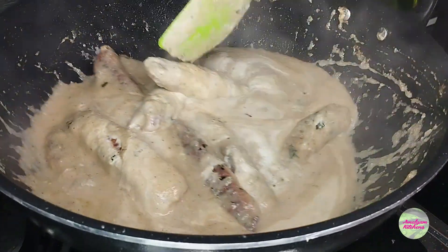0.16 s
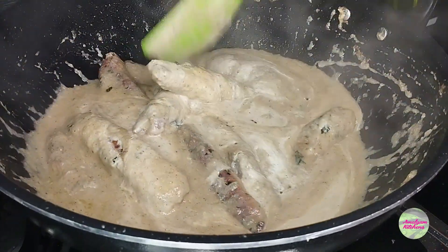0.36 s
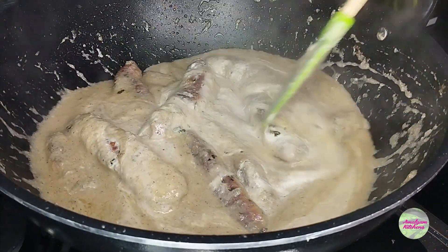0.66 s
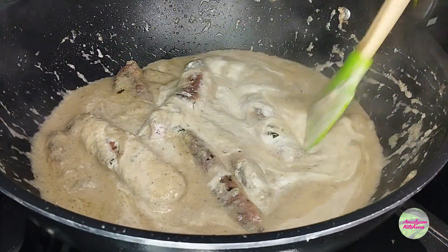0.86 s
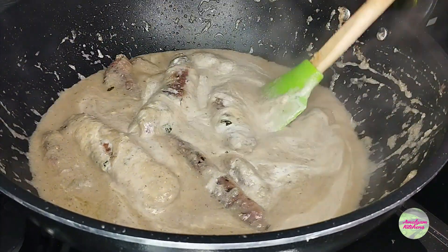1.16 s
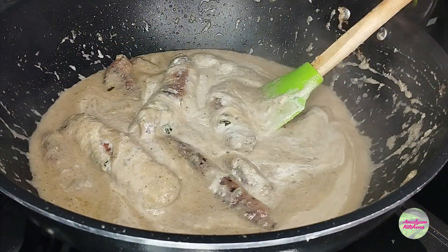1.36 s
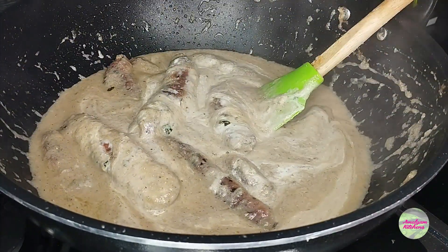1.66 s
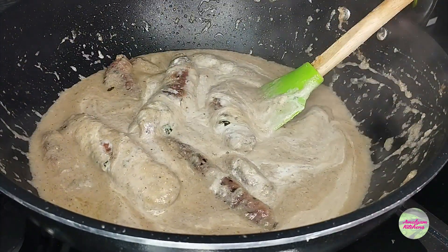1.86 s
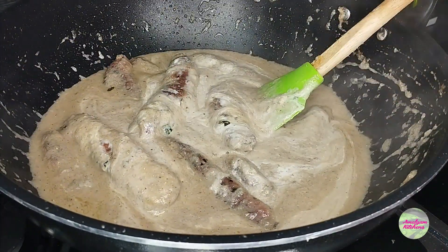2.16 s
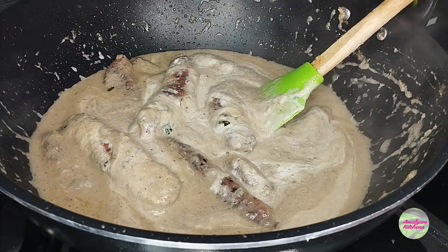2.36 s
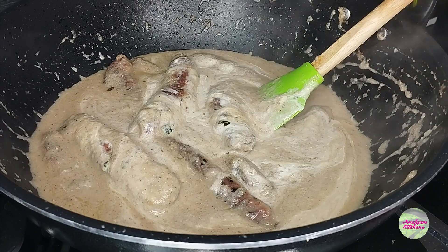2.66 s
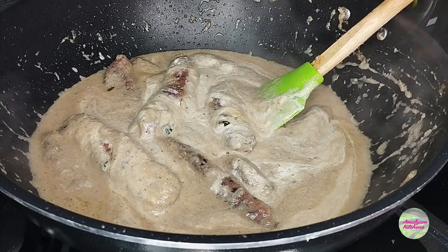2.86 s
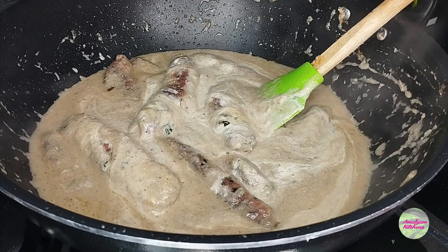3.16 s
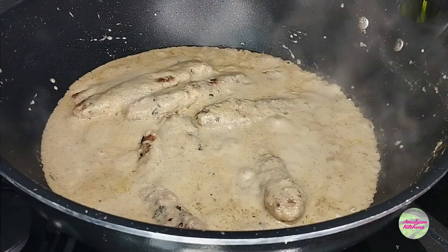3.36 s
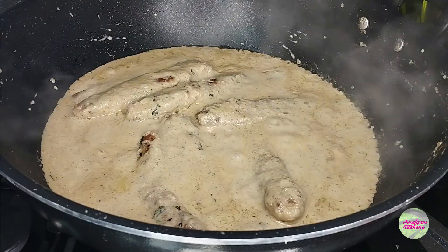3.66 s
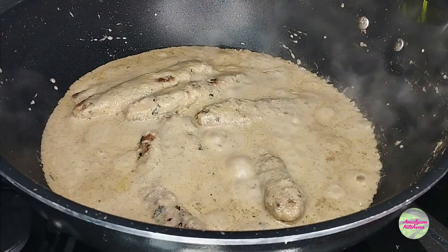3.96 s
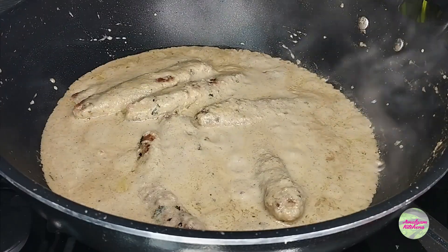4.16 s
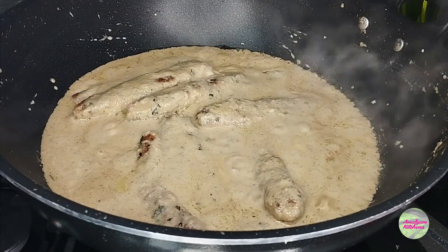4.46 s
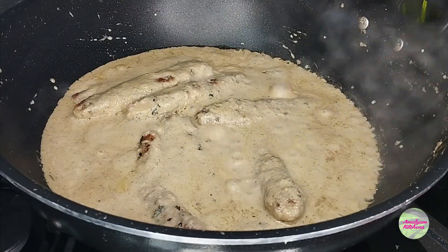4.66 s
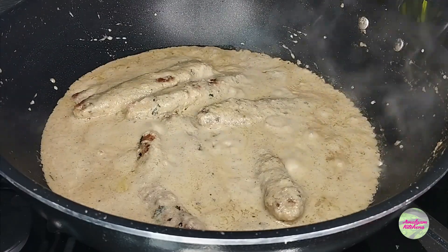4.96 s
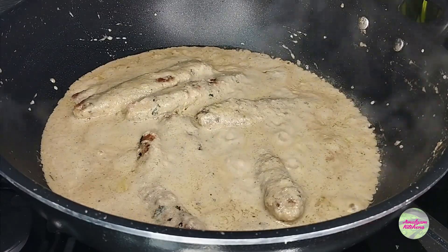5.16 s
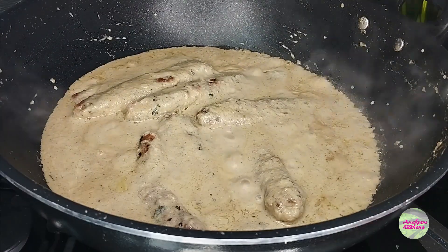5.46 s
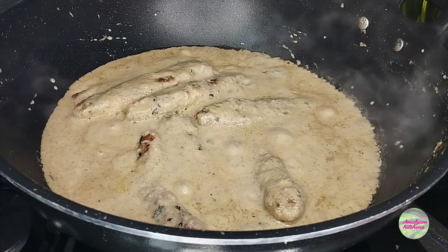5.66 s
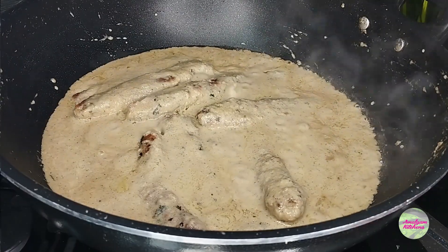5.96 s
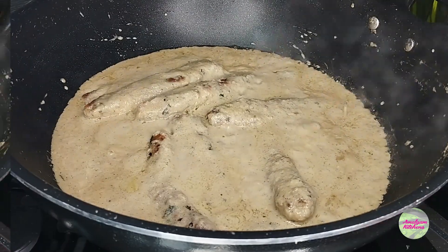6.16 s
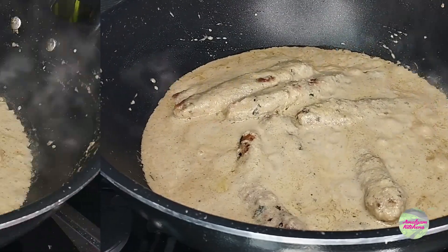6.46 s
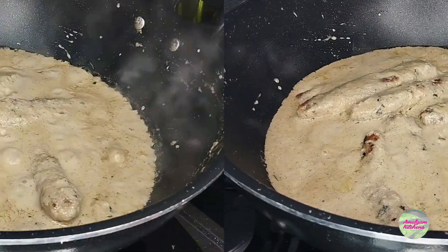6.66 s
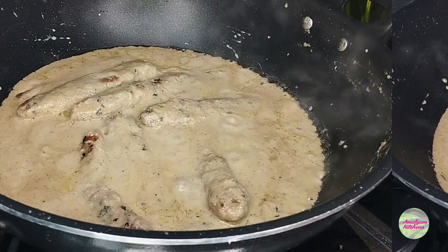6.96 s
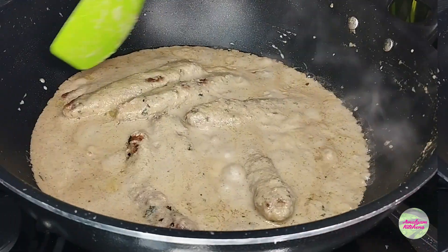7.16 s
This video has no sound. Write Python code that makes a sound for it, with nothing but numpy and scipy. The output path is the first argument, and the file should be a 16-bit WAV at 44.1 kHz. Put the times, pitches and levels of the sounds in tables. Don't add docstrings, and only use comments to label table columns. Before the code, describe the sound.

Quiet wide stereo room tone with low spatula knocks at the start, small crisp spits, dull fan thuds, a soft rim tap with a distant squeak, and one bright metal clink. Abruptly the microphone is right over thick boiling gravy, centred and loud, with gulping bubbles, sputtering steam and bassy air rumble under a very high whine. After a momentary gap, the boil returns turned down.

```python
import sys
import numpy as np
from scipy import signal
from scipy.fft import rfft, irfft
from scipy.io import wavfile

SR = 44100
rng = np.random.default_rng(int(sys.argv[2]) if len(sys.argv) > 2 else 0)


def to_wav(sig):
    pcm = np.clip(np.atleast_2d(sig), -1, 1) * 32767
    pcm = np.round(pcm).astype(np.int16)
    wavfile.write(sys.argv[1], SR, pcm.T)


def linear_from_db(decibels):
    return 10 ** (np.asarray(decibels, float) / 20)


N = 322306
CUT_IN_S, CUT_OUT_S, RESUME_S = 3.2915, 6.6935, 6.7635

# [f/Hz, width/Hz, level/dB]
WOK_RINGS = [(190, 8.2, -0.5), (244.7, 8.3, -2), (350, 37, -4), (503, 8.1, 1), (600, 51, 1.5),
             (722, 72, -1), (942, 6.3, -12), (1450, 110, -2), (2000, 96, -6), (2550, 43, -10.5)]


def rms_one(x):
    return x / np.sqrt(np.mean(x ** 2) + 1e-20)


def at_hz(points, hz):
    f_hz, value = np.array(points).T[:2]
    return np.interp(np.log(hz), np.log(f_hz), value)


def in_time(rows):
    s, *columns = np.transpose(rows)
    return [np.interp(np.arange(N) / SR, s, c) for c in columns]


def drift(rate):
    r = np.exp(-80 * np.pi * rate / SR)
    slow = signal.lfilter([1], [1, -2 * r, r * r], rng.standard_normal(N // 40 + 2002))[2000:]
    return np.interp(np.arange(N) / 40, np.arange(len(slow)), rms_one(slow))


def tone(hz):
    return np.sin(2 * np.pi * np.cumsum(hz) / SR)


def coloured(spectrum):
    hz = np.maximum(np.arange(N // 2 + 1) * SR / N, 1)
    return irfft(rfft(rng.standard_normal(N)) * linear_from_db(at_hz(spectrum, hz)), N)


def ring(clicks, hz, t60):
    r, w = linear_from_db(-60 / (t60 * SR)), 2 * np.pi * hz / SR
    return signal.lfilter([0, np.sin(w)], [1, -2 * r * np.cos(w), r * r], clicks + 1e-18)


def struck(hits, modes, offset_db, spread_db, split_hz=200):
    hits, out = np.array(hits), np.zeros(N)
    luck = rng.standard_normal((len(hits), len(modes)))
    at = (hits[:, 0] * SR).astype(int)
    for k, (hz, level_db, t60) in enumerate(modes):
        clicks = np.zeros(N)
        upper_db = hits[:, 2] * (hz > split_hz) if hits.shape[1] > 2 else 0
        clicks[at] = linear_from_db(hits[:, 1] + upper_db + level_db + offset_db + spread_db * luck[:, k])
        out[:4 * SR] += ring(clicks[:4 * SR], hz, t60)
    return out


def hisses(events, offset_db):
    out, jet = np.zeros(N + SR), rng.standard_normal(N + SR)
    for s, peak_db, hz, length, octaves in events:
        decay_s = max(length, .002)
        at, t = int(s * SR), np.arange(int(4.5 * decay_s * SR)) / SR
        edges = np.clip(hz * 2 ** (np.array([-.5, .5]) * max(octaves, .03)), 50, .45 * SR)
        band = signal.butter(2, edges, "band", fs=SR, output="sos")
        shape = np.minimum(t / 0.00037, 1) * np.exp(-t / decay_s)
        noise = rms_one(signal.sosfilt(band, jet[at:at + len(t)]))
        out[at:at + len(t)] += linear_from_db(peak_db + offset_db) * shape * noise
    return out[:N]


def air():
    # [f/Hz, level/dB per Hz]
    air_spectrum = [(7.1, -32), (12, 10), (30, -0.5), (86, -2.5), (134, -17), (186, -17.5), (283, -14),
                    (442, -23), (827, -28), (1020, -35), (2080, -39.5), (6090, -45.5), (10700, -58),
                    (12100, -51), (14900, -48)]
    # [f/Hz, share]
    likeness = [(60, 0.81), (180, 1), (550, 0.41), (1650, 0.01), (4970, 0.045), (15000, 0.057)]
    hz = np.maximum(np.arange(N // 2 + 1) * SR / N, 1)
    alike = np.clip(at_hz(likeness, hz), 0, 1)
    mid = rfft(coloured(air_spectrum)) * np.sqrt(1 + alike)
    side = rfft(coloured(air_spectrum)) * np.sqrt(1 - alike)
    level_db = -37.5 + 1.2 * drift(3)
    return linear_from_db(level_db) * rms_one(irfft(np.array([mid + side, mid - side]), N))


def coil():
    carriers_hz, ripple_hz = (15595.9, 11696.9), 100.5
    multiples = [
        [-6, -5, -4, -3, -2, -1, 0, 1],
        [-2, -1, 0, 1, 3],
    ]
    lines_db = [
        [-29, -30, -34, -24, -19, -16, 0, -13],
        [-31, -29, -12.5, -25, -33],
    ]
    t, out = np.arange(N) / SR, np.zeros(N)
    wander = np.cumsum(1.3 * drift(0.426)) / SR
    for hz, offsets, levels_db in zip(carriers_hz, multiples, lines_db):
        for k, line_db in zip(offsets, levels_db):
            out += np.sqrt(2) * linear_from_db(line_db) * np.sin(2 * np.pi * ((hz + k * ripple_hz) * t + wander))
    return out


def chirp():
    level_db = -84.5 + 2.0 * drift(20)
    return linear_from_db(level_db) * tone(6100 * (1 + 0.0055 * drift(97)))


def chatter(x, length):
    t = np.arange(int(4 * length * SR)) / SR
    rattle = rng.standard_normal(len(t)) * np.exp(-t / length)
    return signal.fftconvolve(x, rattle / np.sqrt(np.sum(rattle ** 2)))[:N]


def knocks():
    # [t/s, peak/dB]
    contacts = [
        (0.0597, -20.5),
        (0.0655, -21.5),
        (0.139, -28.5),
        (0.201, -28),
    ]
    # [f/Hz, level/dB, t60/s]
    wok_full = [(165, -8, 0.12), (206.7, 1.5, 0.18), (270.4, 9, 0.096), (299, -2.5, 0.094),
                (630, 4.5, 0.07), (693.3, 15, 0.088)]
    # [level/dB, centre f/Hz, length/s, width/octaves]
    thud_bands = [(-5, 285, 0.049, 1), (-4, 700, 0.022, 1.0), (-6, 1150, 0.014, 1), (-14, 2200, 0.016, 1.0),
                  (-20, 4200, 0.012, 0.6)]
    body = [(s, peak_db + band_db, hz, length, octaves)
            for s, peak_db in contacts for band_db, hz, length, octaves in thud_bands]
    stir_tail = (0, -49, 2500, .05, 1.5)
    soft = signal.lfilter([.2], [1, -.8], struck(contacts, wok_full, offset_db=-5.5, spread_db=6.0))
    return chatter(soft, length=0.0034) + hisses(body + [stir_tail], offset_db=-8.0)


def spits():
    # [t/s, peak/dB, centre f/Hz]
    narrow = [(0.099, -47, 9700), (0.15, -38, 3920), (0.1674, -49, 3410), (0.3651, -47, 13100),
              (0.464, -47, 6500), (0.569, -35, 4300), (0.609, -42, 13300), (0.6659, -38.5, 5170),
              (0.849, -37.5, 14000), (1.141, -48, 9550)]
    # [t/s, peak/dB]
    broad = [
        (0.588, -42),
        (0.839, -44),
        (0.848, -40.5),
    ]
    length_s = 0.0048
    events = [(*row, length_s, 0.45) for row in narrow]
    events += [(*row, 3250, length_s, 1.7) for row in broad]
    return hisses(events, offset_db=-8.5)


def fan_thuds():
    # [t/s, peak/dB, upper mode share/dB]
    thuds = [(0.396, -33.5, 3.5), (0.478, -36.5, 6.5), (0.659, -35, 1), (0.779, -32.5, 3),
             (0.872, -32, -0.5), (1.041, -38.5, 5), (1.144, -35, 7), (1.433, -34.5, 9.5), (1.613, -35, 1),
             (1.713, -35.5, 4.5), (1.816, -30.5, -4), (2.012, -35.5, 4.5), (2.114, -35, 7.5),
             (2.303, -37, 8), (2.408, -45, 18.5), (2.583, -40.5, 10.5), (2.689, -43.5, 18),
             (2.865, -38, 2.5), (2.983, -35, 7), (3.085, -34.5, 6.5)]
    # [f/Hz, level/dB, t60/s]
    housing = [(103.7, -8.5, 0.16), (183, 4.5, 0.11), (240, -0.5, 0.15), (490, -10, 0.025),
               (814, -23, 0.21)]
    blows = struck(thuds, housing, offset_db=2.0, spread_db=0.5)
    rebound = np.roll(blows, round(0.01044 * SR))
    out = signal.lfilter([.012], [1, -1.78, .792], -.8 * blows - 0.43 * rebound)
    return out + hisses([(s, peak_db, 720, .016, 1.1) for s, peak_db, _ in thuds], offset_db=-17.5)


def squeaks():
    # [t/s, f/Hz, level/dB]
    tracks = [
        [(1.29, 5550, -80), (1.47, 6250, -80), (1.55, 5750, -73), (1.73, 4850, -77), (1.75, 4800, -90)],
        [(1.27, 4550, -78), (1.32, 4750, -75), (1.45, 5200, -73), (1.6, 4850, -78), (1.75, 3750, -88),
         (1.88, 3620, -82), (1.93, 3500, -93)],
    ]
    # [t/s, peak/dB, centre f/Hz, length/s, width/octaves]
    rub = [
        (1.27, -69.5, 4800, 0.18, 0.46),
        (1.36, -69.5, 3000, 0.39, 1.4),
        (1.42, -77, 5400, .15, 0.35),
    ]
    out = hisses(rub, offset_db=-4.5)
    for rows, waver in zip(tracks, (.003, .05)):
        (start_s, start_hz, _), (end_s, end_hz, _) = rows[0], rows[-1]
        points = [(start_s - .02, start_hz, -120), *rows, (end_s + .02, end_hz, -120)]
        hz, level_db = in_time(points)
        flicker_db = 5 * drift(30)
        out += linear_from_db(level_db + flicker_db) * tone(hz * (1 + waver * drift(125.0)))
    return out


def tap():
    # [t/s, peak/dB, upper mode share/dB]
    contacts = [
        (1.3145, -38, 7),
        (1.323, -27, -9),
        (1.331, -29, -20),
    ]
    # [f/Hz, level/dB, t60/s]
    rim = [(215, -2, .09), (366, -5, .24), (405, -8, .14), (570, 1, .03), (940, -3, .03), (1120, -7, .025),
           (1300, -4, .018), (1490, -5, .022), (2900, 6, .012)]
    coating = signal.butter(4, 1650, fs=SR, output="sos")
    return signal.sosfilt(coating, struck(contacts, rim, offset_db=-2.5, spread_db=0, split_hz=480))


def clink():
    # [t/s, peak/dB]
    blow = [
        (2.3042, -14.5),
    ]
    # [f/Hz, level/dB, t60/s]
    steel = [(1270, -15, .04), (1980, -12, .05), (2140, -4, .06), (2230, -5, .05), (2860, -6, .045),
             (2950, -2, .05), (3440, -7, .04), (3750, -15, .03), (4030, -4, .05), (4200, -10, .04),
             (5000, -15, .03), (5500, -11, .04), (6300, -15, .025), (7150, -13, .025)]
    s, peak_db = blow[0]
    body = [(s, peak_db - 3, 9000, .005, 1.5),
            (s, peak_db + 2, 3000, .022, 1.1),
            (s, peak_db - 5, 6000, .014, .7)]
    return struck(blow, steel, offset_db=-6.5, spread_db=0) + hisses(body, offset_db=-16)


def kitchen(x):
    t60_s, side_db = 0.64, 2
    t = np.arange(int(.7 * SR)) / SR
    noise = rng.standard_normal((2, len(t)))
    dull = signal.sosfilt(signal.butter(1, 5000, fs=SR, output="sos"), noise)
    treble = (noise - dull) * linear_from_db(-90 * t)
    mid, side = (dull + treble) * linear_from_db(-60 * t / t60_s) * (t > .003)
    side = linear_from_db(side_db) * signal.sosfilt(signal.butter(2, 350, "high", fs=SR, output="sos"), side)
    tail = np.array([mid + side, mid - side]) / np.sqrt(2 * np.sum(mid ** 2))
    return signal.fftconvolve(x[None, :4 * SR], tail, axes=1)[:, :4 * SR]


def quiet_shot():
    spatula, thuds, handle, steel = knocks(), fan_thuds(), tap(), clink()
    squeak = chirp() + squeaks()
    out = air() + linear_from_db(-72) * coil() + spatula + spits() + thuds
    out += linear_from_db(9.5) * squeak + linear_from_db(2.0) * handle
    out += steel * linear_from_db(np.array([[-5], [-6]]))
    wet = linear_from_db(-3.5) * spatula + linear_from_db(-7.0) * thuds + linear_from_db(12.0) * squeak
    wet += linear_from_db(-3.5) * handle + linear_from_db(-11.5) * steel
    out[:, :4 * SR] += kitchen(wet)
    return out


def fan_draught(heave_db):
    # [f/Hz, level/dB per Hz]
    rumble = [(4, -60), (8, 3), (16, -1.5), (25, -3), (33, -10.5), (42, -6.5), (62, -23), (81, -13),
              (100, -16.5), (125, -29), (160, -66), (250, -56.5)]
    throb_db = -6.5 + 4.1 * drift(3.9)
    throb = linear_from_db(throb_db) * tone(25.1 * (1 + 0.0638 * drift(3.06)))
    return linear_from_db(heave_db - 0.5) * (rms_one(coloured(rumble)) + throb)


def plops(heave_db):
    out, surge = np.zeros(N), drift(7)
    for hz, width_hz, ring_db in WOK_RINGS:
        happens = rng.random(N) < 90 * linear_from_db(4 * surge) / SR
        strength = linear_from_db(2.7 * np.minimum(rng.exponential(1, N), 4))
        kicks = happens * strength * rng.choice([-1, 1], N)
        out += linear_from_db(ring_db) * rms_one(ring(kicks, hz, 1.87 / width_hz))
    return linear_from_db(-34.5 + heave_db + 20.0) * rms_one(out)


def steam_bed(steam_db):
    # [f/Hz, level/dB per Hz]
    steam = [(100, -51), (140, 0), (255, 2.5), (500, -2.5), (1030, -6.5), (1440, -9), (3400, -13),
             (5800, -13.5), (9000, -20.5), (12500, -23), (14500, -43), (16000, -39)]
    return linear_from_db(steam_db + 2.5 + 1.98 * drift(32.6)) * rms_one(coloured(steam))


def simmer(steam_db):
    luck = rng.random((340, 5))
    s = CUT_IN_S + luck[:, 0] * (N / SR - CUT_IN_S)
    octaves_up = 3.68 * luck[:, 2] ** 1.685
    level_db = steam_db[(s * SR).astype(int)] + 14 * luck[:, 1] - 2.5 * octaves_up
    hz, length_s = 800 * 2 ** octaves_up, 0.0056 + 0.013 * luck[:, 3]
    octaves = .12 + .6 * luck[:, 4]
    return hisses(np.transpose([s, level_db, hz, length_s, octaves]), offset_db=-7.5)


def bursts():
    # [t/s, peak/dB, centre f/Hz, length/s]
    dull_rows = [(3.347, -14.5, 1550, 0.022), (3.395, -17.5, 1290, 0.018), (3.457, -14, 1450, 0.011),
                 (3.508, -15.5, 1550, 0.025), (3.693, -26, 2740, 0.025), (3.748, -14, 1540, 0.026),
                 (3.878, -8.5, 2710, 0.017), (3.966, -17, 2220, 0.032), (4.04, -10, 1730, 0.014),
                 (4.286, -16, 1640, 0.051), (4.359, -15.5, 1100, 0.061), (4.44, -22, 1190, 0.049),
                 (4.643, -15.5, 1450, 0.033), (4.779, -12, 2640, 0.0085), (4.851, -15.5, 1490, 0.016),
                 (4.884, -14, 1040, 0.022), (5.048, -17, 1940, 0.13), (5.257, -18.5, 1340, 0.12),
                 (5.329, -18, 2000, 0.086), (5.355, -11, 1260, 0.051), (5.413, -3.5, 1410, 0.0052),
                 (5.488, -17.5, 1420, 0.031), (5.606, -19.5, 2770, 0.19), (5.835, -15.5, 1110, 0.11),
                 (6.026, -10.5, 2550, 0.0053), (6.089, -12, 2640, 0.01), (6.135, -32, 1440, 0.064),
                 (6.267, -10.5, 1430, 0.019), (6.501, -15, 980, 0.055), (6.548, -14, 1450, 0.036)]
    # [t/s, peak/dB, f/Hz]
    pops = [(3.397, -15.5, 2500), (3.508, -13, 2630), (3.6056, -13, 2580), (3.689, -23, 2680),
            (3.753, -12, 2620), (3.812, -22, 2650), (3.876, -14, 2670), (3.956, -17, 2660),
            (3.973, -19, 2620), (3.975, -19, 2080), (4.037, -9.5, 2020), (4.055, -13, 2600),
            (4.142, -10, 2500), (4.236, -22, 2030), (4.29, -25, 2050), (4.353, -13, 2740),
            (4.391, -21, 2800), (4.503, -28, 2150), (4.651, -21, 2130), (4.929, -17, 2000),
            (5.053, -26, 2000), (5.13, -20, 2000), (5.315, -25, 2000), (5.352, -22, 2000),
            (5.439, -13, 2560), (5.49, -18, 2500), (5.545, -12, 2550), (5.576, -16, 2570),
            (5.608, -21, 2800), (5.625, -19, 2600), (5.709, -21, 2620), (5.815, -21, 2620),
            (5.853, -10.5, 2500), (5.975, -24, 2550), (6.115, -18, 2540), (6.266, -9.5, 2530),
            (6.411, -26, 2520)]
    # [t/s, peak/dB]
    splats = [(3.345, -8), (3.508, -22), (3.689, -24), (3.876, -20), (4.389, -11), (4.5, -17), (4.652, -17),
              (4.776, -19), (5.055, -22), (5.376, -15), (5.815, -23), (5.88, -14), (6.02, -15),
              (6.088, -18.5), (6.265, -21), (6.512, -15)]
    # [t/s, peak/dB, centre f/Hz]
    bright_rows = [(3.294, -39, 3740), (3.334, -23, 3900), (3.3966, -23, 4930), (3.5643, -22.5, 4600),
                   (3.6096, -7, 6050), (3.8142, -24, 4150), (4.0876, -25, 5950), (4.162, -19, 5930),
                   (4.39, -18.5, 4170), (4.4582, -23, 9400), (4.604, -22, 5500), (4.771, -19.5, 4950),
                   (5.1107, -27, 5530), (5.1816, -29, 7140), (5.2394, -24, 6600), (5.337, -17.5, 5300),
                   (5.499, -19, 6400), (5.922, -21.5, 5830), (5.969, -21.5, 4700), (6.142, -20.5, 4300),
                   (6.198, -19, 5100), (6.268, -16, 5170), (6.3165, -25, 5460), (6.4244, -22.5, 5500),
                   (6.512, -19.5, 5660), (6.5863, -22.5, 6100), (7.209, -32, 4760), (7.266, -25, 5970),
                   (7.29, -27, 4570)]
    # [t/s, peak/dB]
    thin_rows = [(3.3517, -24.5), (4.1484, -35), (4.6124, -28), (5.3497, -25), (6.0606, -28), (6.3165, -33),
                 (6.5111, -27)]
    # [t/s, peak/dB, centre f/Hz, length/s, width/octaves]
    leaks = [
        (4.14, -28.5, 10750, 0.098, 0.38),
        (4.89, -37, 1927, 0.51, 0.066),
        (5.27, -47, 2000, 0.11, 0.09),
    ]
    dull = [(*row, .25 + 9.0 * row[3]) for row in dull_rows]
    dull += [(*row, 0.013, 0.17) for row in pops]
    dull += [(*row, 2000, 0.017, 1.85) for row in splats]
    bright = [(s, db, hz, 0.03 * np.exp(-.03 * (db + 23.0)), 0.73) for s, db, hz in bright_rows]
    thin = [(*row, 12400, 0.031, 1) for row in thin_rows]
    out = hisses(dull, offset_db=-16.0) + hisses(bright, offset_db=-12)
    return out + hisses(thin, offset_db=-8) + hisses(leaks, offset_db=-4.5)


def bubbles():
    # [t/s, peak/dB, centre f/Hz]
    blips = [(3.291, -18, 503), (3.345, -21, 503), (3.389, -23, 641), (3.452, -24, 520), (3.493, -22, 554),
             (3.536, -13, 530), (3.604, -22, 498), (3.755, -17, 503), (3.788, -27, 610), (3.912, -21, 500),
             (3.979, -18, 520), (4.047, -28, 522), (4.109, -33, 654), (4.134, -36, 650), (4.217, -23, 505),
             (4.328, -19, 590), (4.377, -12.5, 654), (4.427, -27, 524), (4.579, -33, 500),
             (4.614, -22, 501), (4.712, -32, 650), (4.824, -28, 480), (4.887, -31, 520), (4.939, -21, 600),
             (5.038, -21, 581), (5.089, -19, 506), (5.206, -26, 517), (5.381, -26, 488), (5.408, -22, 590),
             (5.496, -20, 517), (5.532, -21, 493), (5.605, -23, 480), (5.659, -25, 503), (5.754, -19, 565),
             (5.805, -23, 500), (5.84, -17, 504), (5.878, -11, 493), (5.992, -25, 511), (6.042, -23, 504),
             (6.084, -37, 503), (6.124, -36, 493), (6.267, -20, 513), (6.418, -25, 700), (6.512, -19, 646),
             (6.622, -22, 520)]
    # [t/s, peak/dB, centre f/Hz]
    clucks = [(3.2923, -27, 920), (3.3447, -19, 950), (3.3966, -25, 1270), (3.4525, -19, 1520),
              (3.5084, -25, 1470), (3.5463, -21, 1340), (3.744, -19, 1550), (3.8755, -24, 942),
              (3.9354, -26, 1310), (4.0426, -18, 1590), (4.2167, -27, 1390), (4.2851, -22, 1580),
              (4.3697, -12, 1460), (4.4402, -19, 950), (4.4996, -24, 1330), (4.5929, -17, 1560),
              (4.765, -23, 970), (4.8428, -17, 980), (4.8873, -16, 945), (4.9236, -22, 996),
              (5.057, -14, 961), (5.1591, -26, 977), (5.195, -19, 950), (5.2604, -27, 1330),
              (5.3337, -17, 1010), (5.3753, -13, 940), (5.416, -19, 1430), (5.4839, -21, 970),
              (5.7538, -22, 953), (5.7877, -18, 1100), (5.8161, -21, 950), (5.8505, -24, 1090),
              (5.879, -20, 953), (6.0995, -33, 1290), (6.1673, -22, 1470), (6.2676, -18, 1440),
              (6.4138, -25, 890), (6.4646, -24, 1350), (6.5145, -17, 940), (6.5624, -18, 1450)]
    # [t/s, peak/dB, centre f/Hz]
    gulps = [(3.334, -13, 503), (3.419, -17, 333), (3.596, -13.5, 467), (3.909, -11.5, 246),
             (3.984, -11.5, 563), (4.034, -16, 190), (4.155, -19, 191), (4.215, -23, 186), (4.27, -34, 194),
             (4.325, -11, 600), (4.371, -10, 277), (4.606, -16.5, 510), (4.66, -7, 254), (4.938, -16, 600),
             (5.043, -12, 188), (5.088, -10, 525), (5.2, -25, 266), (5.259, -12.5, 180), (5.383, -18, 490),
             (5.49, -17, 515), (5.606, -16, 486), (5.682, -19, 247), (5.839, -10.5, 510), (6.113, -22, 196),
             (6.51, -15, 188), (6.61, -32, 520), (7.289, -22, 494)]
    # [t/s, peak/dB, centre f/Hz]
    last = [(6.772, -36, 890), (6.862, -27.5, 6500), (6.903, -30, 950), (6.972, -22.5, 960),
            (7.013, -27, 5500), (7.029, -18, 925), (7.076, -24, 2700), (7.123, -24, 6500),
            (7.173, -23, 2500), (7.274, -21, 10400), (7.291, -19.5, 2200)]
    out = hisses([(*row, 0.024, 0.14) for row in blips], offset_db=-9.5)
    out += hisses([(*row, .014, 0.14) for row in clucks], offset_db=-11.5)
    out += hisses([(*row, 0.039, 0.26) for row in gulps], offset_db=-15)
    return out + hisses([(*row, 0.01, 0.68) for row in last], offset_db=-16.0)


def through_wok(x):
    out = np.zeros(N)
    for k, (hz, width_hz, _) in enumerate(WOK_RINGS):
        r = np.exp(-np.pi * width_hz / SR)
        poles = [1, -2 * r * np.cos(2 * np.pi * hz / SR), r * r]
        out += (-1) ** k * signal.lfilter([(1 - r * r) / 2, 0, (r * r - 1) / 2], poles, x)
    return out


def boiling_shot():
    # [t/s, heave/dB, steam/dB]
    boil = [
        [(3.3, -22, -32), (3.51, -22, -35), (4.36, -15.5, -35), (4.79, -23, -35), (4.97, -17, -34.5),
         (5.56, -22, -35.5), (6.47, -18.5, -35), (6.69, -19, -34.5)],
        [(6.77, -34.5, -49), (7.3, -31, -44)],
    ]
    # [t/s, level/dB]
    coil_track = [(3.3, -34.5), (4.2, -32.5), (4.3, -36), (6.69, -35.5), (6.76, -54), (6.9, -51),
                  (7.3, -49)]
    heave_db, steam_db = in_time(boil[0] + boil[1])
    coil_db, = in_time(coil_track)
    pockets = bursts() + simmer(steam_db)
    gravy = plops(heave_db) + bubbles() + steam_bed(steam_db) + pockets + linear_from_db(-5.5) * through_wok(pockets)
    return fan_draught(heave_db) + gravy + linear_from_db(coil_db) * coil()


def scene():
    t = np.arange(N) / SR
    close = ((t >= CUT_IN_S) & (t < CUT_OUT_S)) + np.clip((t - RESUME_S) / .007, 0, 1)
    return quiet_shot() * (t < CUT_IN_S) + boiling_shot() * close


def low_pass(x):
    return signal.sosfilt(signal.butter(12, 17150, fs=SR, output="sos"), x)


def record(dry):
    mix = signal.sosfilt(signal.ellip(10, .3, 60, 15780, fs=SR, output="sos"), dry)
    return low_pass(mix)


dry = scene()
out = record(dry)
to_wav(out)
```